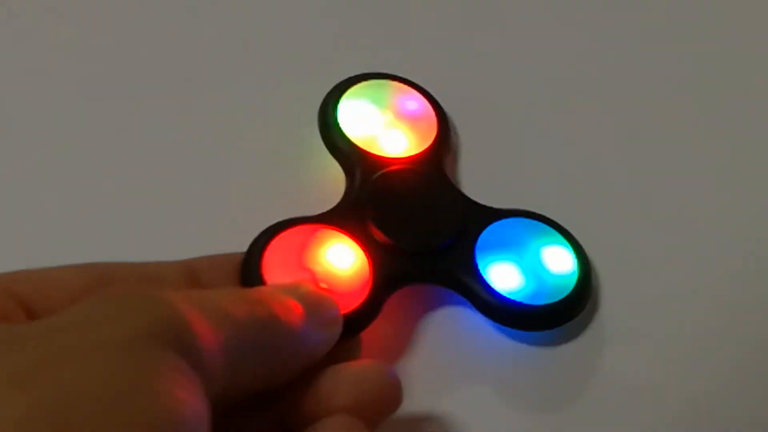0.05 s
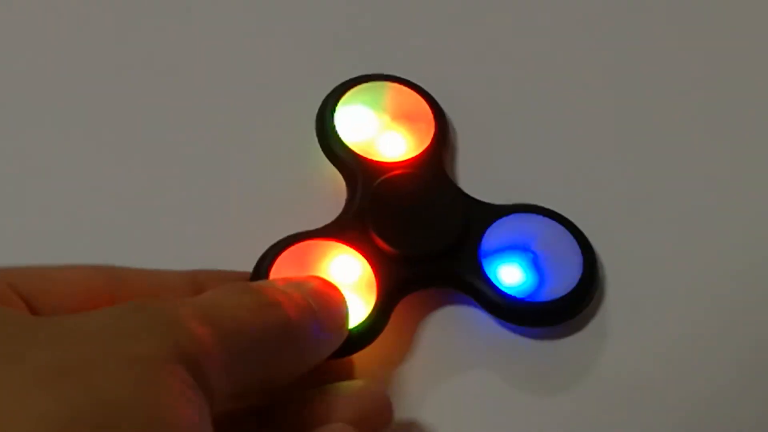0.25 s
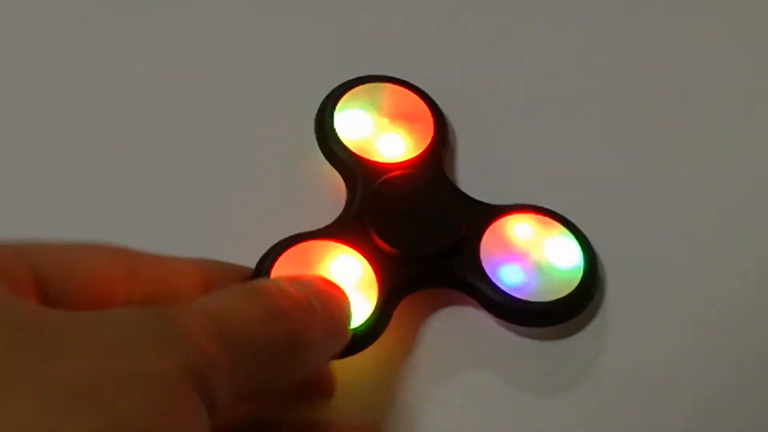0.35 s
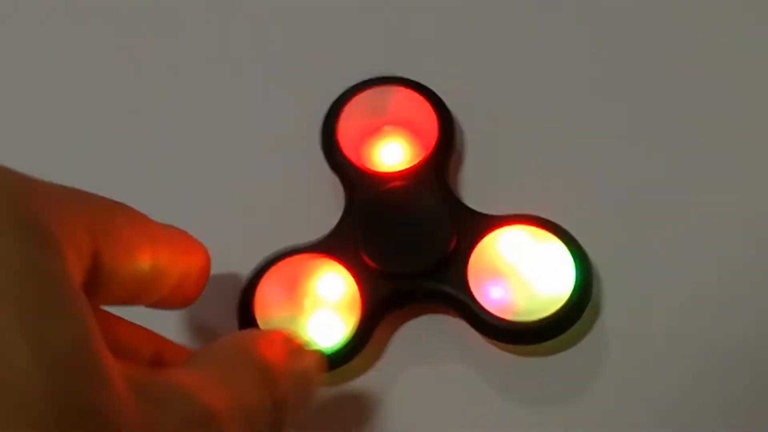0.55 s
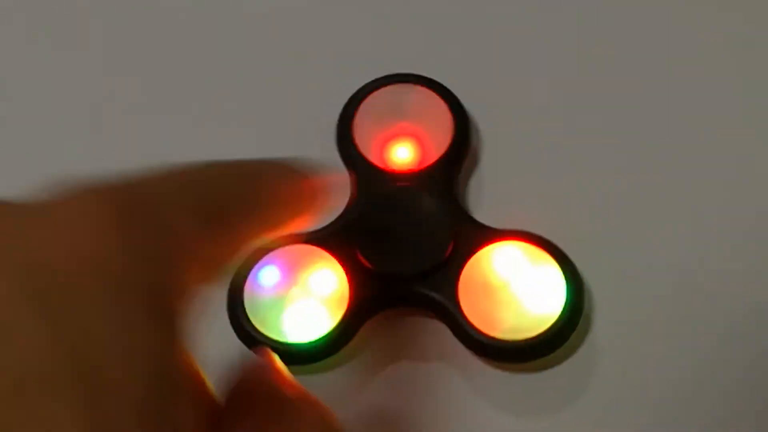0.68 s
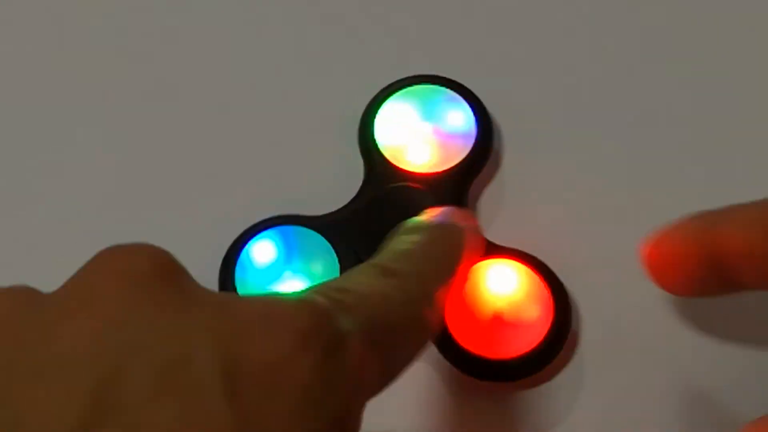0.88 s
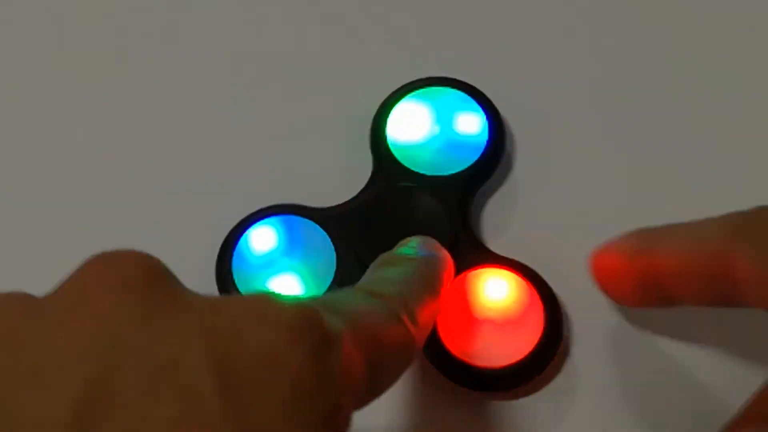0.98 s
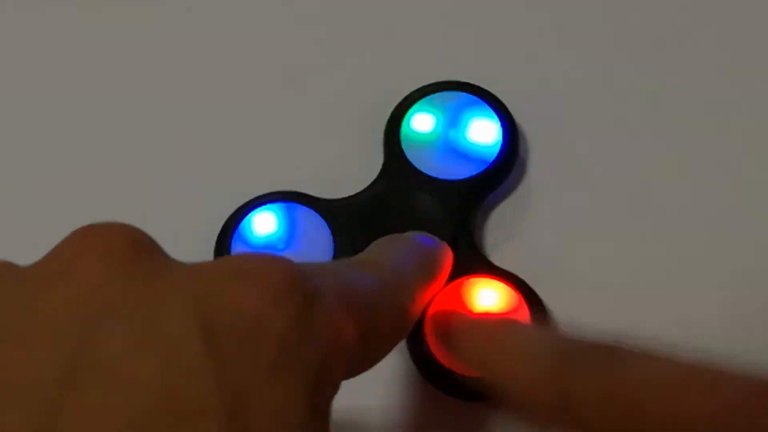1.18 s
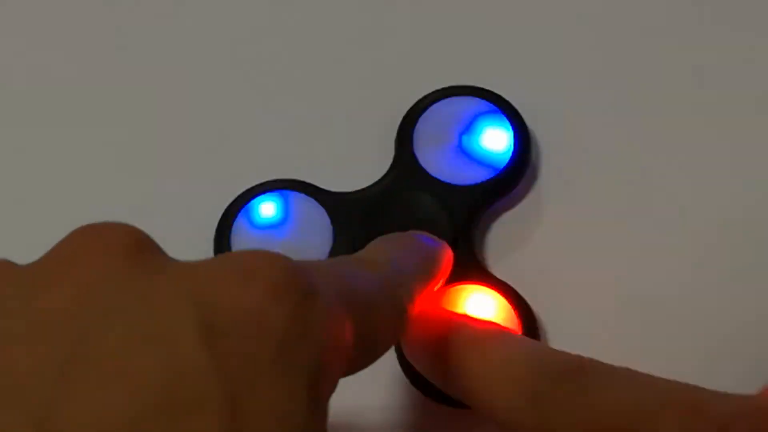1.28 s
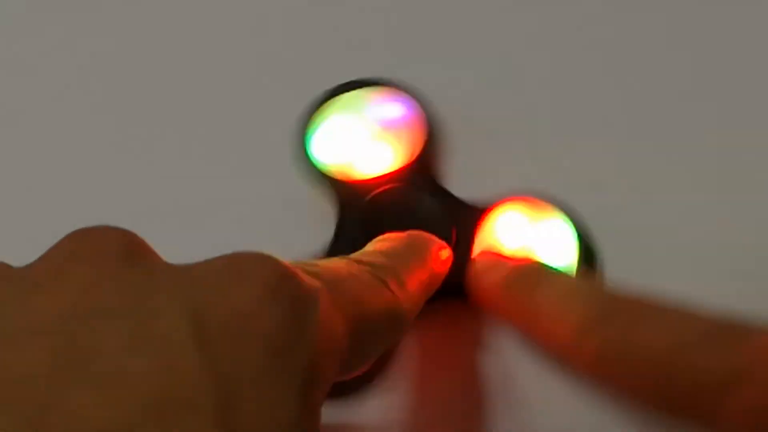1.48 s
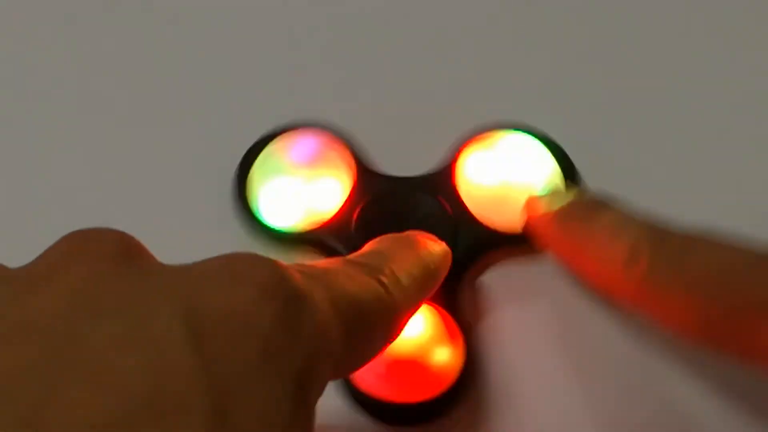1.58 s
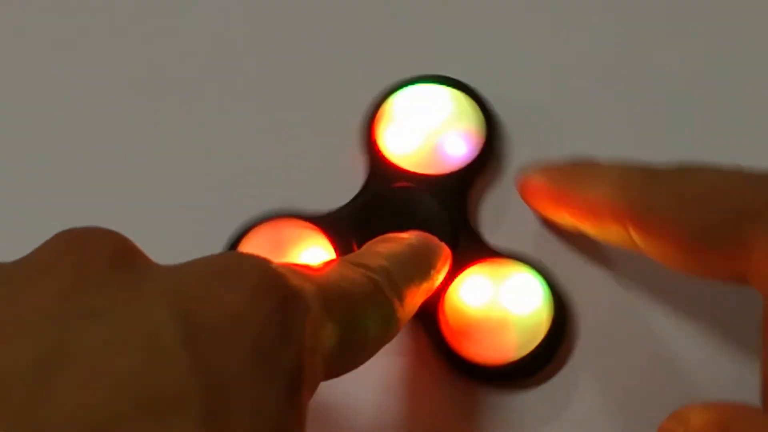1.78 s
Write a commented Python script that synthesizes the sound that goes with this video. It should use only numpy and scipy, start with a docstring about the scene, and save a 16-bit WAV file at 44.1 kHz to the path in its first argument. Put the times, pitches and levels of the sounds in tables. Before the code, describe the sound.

A toy spinner rattles briefly with a bright, metallic chatter as fingers push it.

```python
"""On a table in a quiet small room, a toy spinner is pushed round by hand, close to the microphone.
For a third of a second it rattles: quick, uneven knocks make it ring near 6 kHz, tiny slips add a fine
chatter, and the pushes make its plastic body thrum softly. Fingers tick on it before and after.
A deep hum swells, sags in pitch and fades under the room noise."""
import sys
import numpy as np
from scipy import signal
from scipy.fft import rfft, irfft
from scipy.io import wavfile
from scipy.ndimage import uniform_filter1d

SR = 44100
rng = np.random.default_rng(int(sys.argv[2]) if len(sys.argv) > 2 else 0)


def waveform_to_disk(signal):
    """Save audio, clipped to [-1, 1], as 16-bit WAV at the path in sys.argv[1]."""
    frames = np.transpose(np.atleast_2d(signal))
    scaled = np.clip(frames, -1, 1) * 32767
    samples = np.round(scaled).astype(np.int16)
    wavfile.write(sys.argv[1], SR, samples)


N = 81585
RING_HZ, RISE_S = 6000, .0004  # the spinner's usual pitch; how quickly a ring or a puff starts


def amp(db):
    """Turns decibels into a number to multiply a sound by."""
    return 10 ** (np.asarray(db) / 20)


def unit(x):
    """Scales a sound to an average power of one."""
    return x / np.sqrt(np.mean(x ** 2) + 1e-20)


def curve(points, column=1):
    """Joins the points of a time table with straight lines, giving one value per sample."""
    rows = np.array(points)
    return np.interp(np.arange(N) / SR, rows[:, 0], rows[:, column])


def read(points, hz):
    """Looks up frequencies in a table, on a scale where octaves are evenly spaced."""
    f, value = np.transpose(points)
    return np.interp(np.log(hz + 1), np.log(f + 1), value)


def add(mix, s, sound):
    """Adds a stereo sound to the mix, starting at s seconds."""
    part = mix[:, max(round(s * SR), 0):][:, :sound.shape[1]]
    part += sound[:, :part.shape[1]]


def through(x, response):
    """Lets every sample of x set off its own copy of a stereo response (convolution)."""
    return signal.fftconvolve(np.atleast_2d(x), response, axes=1)[:, :N]


def colour(x, points):
    """Shapes bass and treble by a table; white noise keeps its overall power."""
    gain = unit(amp(read(points, np.fft.rfftfreq(N, 1 / SR))))
    return irfft(rfft(x) * gain, N)


def burst(decay_s):
    """A short puff of noise with a slightly rounded start, different on each side."""
    t = np.arange(1024) / SR
    return rng.standard_normal((2, len(t))) * np.exp(-t / decay_s) * (1 - np.exp(-t / RISE_S)) * 2


def hum(third_db=-40, side_db=-21):
    """A deep, nearly pure tone, with a faint one at three times its pitch and a rumble around it."""
    # how the hum moves: t/s, f/Hz, level/dB
    course = [(0.0, 63.4, -75.5), (0.092, 60.7, -77), (0.144, 62.2, -62), (0.216, 61.74, -53.5),
              (0.422, 61.62, -48), (0.534, 61.8, -52.5), (0.582, 62.8, -68), (0.618, 60.65, -53),
              (0.664, 59.15, -55.5), (0.716, 58.6, -45.5), (0.864, 56.95, -40.5), (1.102, 57.56, -41),
              (1.472, 56.3, -51), (1.642, 53.7, -63), (1.726, 53.7, -62.5), (1.85, 53.4, -85)]
    # tone colour of the rumble: f/Hz, level/dB
    rumble_colour = [(15,-7),(30,8),(42,-5.5),(85,0.5),(115,3),(145,-13.5),(175,-11),(210,-21.5),(300,-22.5),(420,-45),(800,-70.5)]
    # loudness of the rumble: t/s, level/dB
    rumble_level = [(0,-83.5),(.2,-70),(.45,-63),(.75,-61.5),(1.1,-54.5),(1.4,-56.5),(1.66,-69.5),(1.77,-63.5),(1.85,-75.5)]
    angle = 2 * np.pi * np.cumsum(curve(course)) / SR
    tone = np.sqrt(2) * amp(curve(course, 2)) * (np.sin(angle) + amp(third_db) * np.sin(3 * angle))
    middle, side = colour(rng.standard_normal((2, N)), rumble_colour)
    rumble = unit(middle) + amp(side_db) * unit(side) * np.array([[1], [-1]])
    return tone + amp(curve(rumble_level)) * rumble


def air():
    """Quiet room noise, alike on the left and right only in the bass."""
    # tone colour of the noise: f/Hz, level/dB
    tone_colour = [(30,5.89),(150,6),(330,1.77),(530,-8),(720,-3),(1100,-5),(2000,-9),(3200,-15),(5000,-23),(8000,-32),(16000,-45)]
    # its loudness: t/s, level/dB
    level = [(0,-73.5),(.4,-72),(.9,-70),(1.4,-72),(1.85,-74)]
    # how alike the two sides are: f/Hz, likeness from 0 to 1
    likeness = [(50,1),(150,0.98),(300,0.39),(600,0.1),(1500,0.069),(8000,0.043)]
    left, other = rfft(rng.standard_normal((2, N)))
    same = np.clip(read(likeness, np.fft.rfftfreq(N, 1 / SR)), -1, 1)
    right = same * left + np.sqrt(1 - same ** 2) * other
    return amp(curve(level)) * colour(irfft(np.array([left, right]), N), tone_colour)


def hiss(level_db=-83):
    """The microphone's own steady hiss."""
    # tone colour of the hiss: f/Hz, level/dB
    tone_colour = [(1000,-1),(4300,2),(4700,2.5),(5300,0.5),(9300,-2.5),(9900,1.5),(10600,-4),(14000,-1),(15100,5.5),(16000,2)]
    return amp(level_db) * colour(rng.standard_normal((2, N)), tone_colour)


def fingers(pat_hz=1000, pat_s=.0019, snap_s=.0015):
    """A fingertip lands on the plastic with a dull pat and a faint snap."""
    # fingertip landings: t/s, pat level/dB, snap level/dB
    touches = [(0.0569,-68,-84),(.175,-79,-78),(0.196,-80,-76),(.439,-67.5,-75),(.5392,-61,-72.5),(1.243,-79,-77)]
    out = np.zeros((2, N))
    t = np.arange(1024) / SR
    pat = np.exp(-t / pat_s) * np.sin(2 * np.pi * pat_hz * t)
    for s, pat_db, snap_db in touches:
        add(out, s, 2 * (amp(pat_db) * pat + amp(snap_db) * burst(snap_s)))
    return out


def room(x, near_db=-11, near_s=.0046, far_db=-15):
    """Adds quick echoes from the hand and table, then the faint lingering sound of the room."""
    # how long the room lingers: f/Hz, time to fade by 60 dB/s
    fade_times = [(200,0.21),(1500,.42),(6000,0.41),(10000,0.28),(16000,0.24)]
    t = np.arange(SR // 2) / SR
    near, far = rng.standard_normal((2, 2, len(t)))
    near = near * np.exp(-t / near_s) * (t > .0008)
    hz, times, bands = signal.stft(far * (t > .006), SR, nperseg=256)
    fade = amp(-60 * times / read(fade_times, hz)[:, None])
    far = signal.istft(bands * fade, SR, nperseg=256)[1]
    return x + sum(amp(db) * through(x, echo / np.linalg.norm(echo[0]))
                   for db, echo in ((near_db, near), (far_db, far)))


def body():
    """The low, dull tones of the plastic body on the table after one nudge."""
    # the body's natural tones: f/Hz, level/dB, time to fade by 60 dB/s
    tones = [(174,-5,.04),(255,3.5,0.044),(340.2,5,0.078),(464,-8.5,0.021)]
    t = np.arange(4096) / SR
    out = sum(amp(db - 60 * t / fade_s) * np.sin(2 * np.pi * hz * t) for hz, db, fade_s in tones)
    return amp([[-1], [1]]) * out / np.sqrt(np.mean(out[:400] ** 2))  # a little louder on the right


def thrum():
    """Each push of the hand sets the plastic body shaking."""
    # the pushes: t/s, level/dB
    pushes = [(0.173,-70),(.438,-60),(0.446,-55.5),(0.458,-60),(.538,-61),(.548,-53),(0.614,-57.5)]
    out = np.zeros((2, N))
    for s, db in pushes:
        add(out, s, amp(db) * body())
    return out


def ring(pitch_hz):
    """The spinner's bright ring after one hit, louder on the right; where it is hit sets the pitch."""
    # its natural tones at the usual pitch: f/Hz, level/dB, time to fade by 60 dB/s, left minus right/dB
    tones = [(1712,-31,0.013,8.5),(2770,-30.5,0.015,-8.5),(3330,-31.5,0.021,4.5),(4375,-19.5,.009,1),(5900,-16.5,0.0044,-6.5),(5960,6,0.0069,-6.5),(5830,-15,.052,0),(6300,-9.5,0.0076,-6),(7080,-14,0.017,-9),(7520,-17.5,0.0073,-9),(10320,-21,0.0068,10)]
    t = np.arange(6000) / SR
    out = np.zeros((2, len(t)))
    for hz, db, fade_s, pan_db in tones:
        lag = np.array([[-.39 + .12 * rng.standard_normal()], [0]])  # left trails by part of a cycle
        cycles = hz * pitch_hz / RING_HZ * t + rng.random()
        sides = amp([[db + pan_db / 2], [db - pan_db / 2]])
        out += sides * amp(-60 * t / fade_s) * np.sin(2 * np.pi * (cycles + lag))
    out *= 1 - np.exp(-t / RISE_S)
    return out / np.sqrt(np.mean(out[:, :128] ** 2))


def strikes(hits, gain_db=-3.5, bounce_db=-7.5, latest_bounce_s=.003):
    """Each hit rings the spinner, then bounces twice, more softly."""
    out = np.zeros((2, N))
    for s, db, hz in hits:
        add(out, s, amp(db + gain_db) * ring(hz))
        for delay_s in rng.uniform(.3, 1, 2) * latest_bounce_s:
            add(out, s + delay_s, amp(db + gain_db + bounce_db) * ring(hz))
    return out


def ticks():
    """The spinner ticks lightly under the fingers."""
    # light hits: t/s, level/dB, ring f/Hz
    hits = [(.197,-64.5,6770),(.2025,-68,5980),(.2065,-72,5800),(.919,-65.5,6630),(1.216,-75.5,6150),(1.569,-78.5,6030)]
    return strikes(hits)


def flutter():
    """Uneven low noise that swells twice while the hum is loud."""
    # tone colour of the flutter: f/Hz, level/dB
    tone_colour = [(90,-27.5),(150,2.5),(180,4.5),(235,-2.5),(300,-18),(420,-47.5)]
    # its loudness: t/s, level/dB
    level = [(.42,-110),(.56,-72),(.74,-68.5),(.86,-71),(.95,-85),(1.04,-69),(1.14,-66),(1.23,-77.5),(1.6,-90.5)]
    return amp(curve(level)) * unit(colour(rng.standard_normal(N), tone_colour))


def chatter(slips_per_s=1600, spread_db=1, ring_db=-56, body_db=-62.5, grit_db=-63):
    """The parts rub in many tiny slips, which stir the ring and the body and add a gritty crackle."""
    # how hard the parts rub: t/s, level/dB
    rubbing = [(.432,-39),(.440,-7),(.462,-8),(.492,3.5),(.533,-4.5),(.548,-1),(.585,4),(.63,0.5),(.68,-4),(.705,-9.5),(.73,-11.5),(.775,-44)]
    sizes = amp(spread_db * np.minimum(rng.exponential(1, N), 3)) * rng.choice([-1, 1], N)
    slips = unit(sizes * (rng.random(N) < slips_per_s / SR)) * amp(curve(rubbing))
    bright, dull = [through(slips, response * np.sqrt(2) / np.linalg.norm(response))
                    for response in (ring(RING_HZ), body())]
    strength = np.sqrt(abs(uniform_filter1d(slips ** 2, 30)))
    grit = strength * rng.standard_normal((2, N))
    return amp(ring_db) * bright + amp(body_db) * dull + amp(grit_db) * crack(grit)


def crack(x, treble_hz=11300):
    """Gives puffs of noise the dry sound of plastic, growing brighter partway through the rattle."""
    # tone colour of a crack: f/Hz, level/dB
    tone_colour = [(300,-15),(700,1.5),(1100,-4.5),(1750,7.5),(2200,4.5),(2700,6),(3700,-1),(4500,8),(7500,5),(8900,-2.5),(10400,-1.5),(12200,-4),(15500,-14.5)]
    # which side is louder: f/Hz, left minus right/dB
    balance = [(900,-5),(1750,5),(2700,-3),(3600,-0.5),(8500,-0.5),(10500,2),(12500,5.5),(15500,5.5)]
    # boost or cut of the highest treble: t/s, gain/dB
    treble_gain = [(.44, -12.5), (.50, -15), (.54, -4), (.58, 1.5), (.66, 2.5), (.72, -2)]
    hz = np.fft.rfftfreq(N, 1 / SR)
    pan_db = read(balance, hz)
    panned = irfft(rfft(x) * amp([pan_db / 2, -pan_db / 2]), N)
    plastic = colour(panned, tone_colour)
    treble = irfft(rfft(plastic) * (1 + np.tanh((hz - treble_hz) / 500)) / 2, N)
    return plastic + (amp(curve(treble_gain)) - 1) * treble


def rattle(crack_db=-62, crack_s=.0011, crack_follow=.503):
    """Quick knocks, each with a ring and a dry crack, mixed with scratches that do not ring."""
    # the knocks: t/s, level/dB, ring f/Hz
    knocks = [(0.4395,-53,6070),(0.4475,-33.5,5520),(0.4547,-35.5,5560),(0.4634,-36.5,5560),(0.469,-39.5,5880),(0.4724,-34.5,6140),(.4802,-36.5,5940),(0.4896,-37.5,6150),(0.4965,-39,6000),(0.5014,-47,6090),(0.5112,-42,6200),(0.5398,-28,6090),(.5486,-42.5,6160),(0.5506,-33.5,6034),(0.5611,-39,5920),(.569,-39.5,6170),(0.5755,-33.5,5660),(0.579,-36,6040),(0.5823,-40,5990),(0.5917,-64,6280),(0.5949,-33,6180),(0.606,-29,5960),(0.6106,-42,6250),(0.6205,-45.5,5920),(0.6269,-36,6470),(0.6408,-34,6110),(0.6474,-36,6360),(0.6579,-33,5950),(0.6641,-38,6250),(0.6737,-34,6240),(0.6797,-40.5,5970),(0.687,-44,5860),(0.695,-44,6110),(0.7069,-45,6040),(0.7116,-43,5970),(0.72,-47.5,6040)]
    # the scratches: t/s, level/dB
    scratches = [(0.491,-59),(.582,-55),(.5875,-58),(.611,-61),(.6268,-50.5),(0.634,-54),(.6378,-51),(0.686,-56)]
    puffs = np.zeros((2, N))
    typical_db = np.median([db for _, db, _ in knocks])
    for s, db, _ in knocks:  # harder knocks crack louder
        add(puffs, s, amp(crack_db + crack_follow * (db - typical_db)) * burst(crack_s))
    for s, db in scratches:
        add(puffs, s, amp(db) * burst(crack_s))
    return strikes(knocks) + crack(puffs)


def brush():
    """Near the end a finger brushes the rim, just enough to keep it ringing."""
    # loudness of the brushing: t/s, level/dB
    level = [(1.48,-110),(1.525,-91.5),(1.572,-82),(1.61,-91),(1.65,-110)]
    return amp(curve(level)) * unit(through(rng.standard_normal(N), ring(RING_HZ)))


def scene():
    """The spinner in the room, over hiss, hum, flutter and room noise."""
    microphone = hiss()
    spinner = thrum() + rattle() + chatter() + ticks() + fingers() + brush()
    return microphone + room(spinner) + hum() + flutter() + air()


def record(dry, cutoff_hz=15750):
    """Cuts away the very highest treble."""
    low_pass = signal.firwin(255, cutoff_hz, window=("kaiser", 7), fs=SR)
    return signal.oaconvolve(dry, low_pass[None], "same")


dry = scene()
out = record(dry)
waveform_to_disk(out)
```